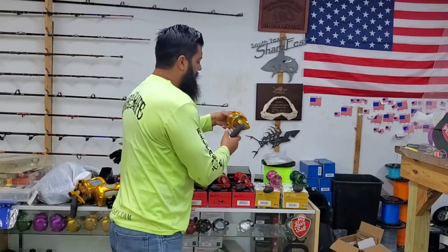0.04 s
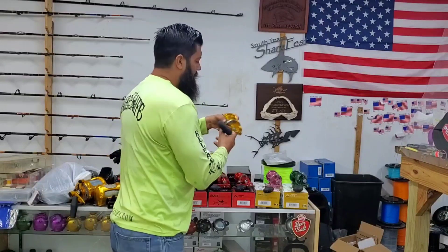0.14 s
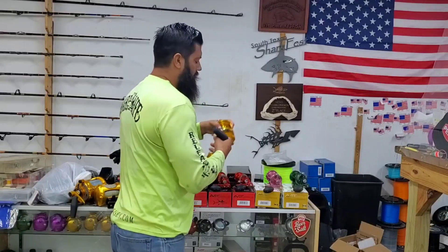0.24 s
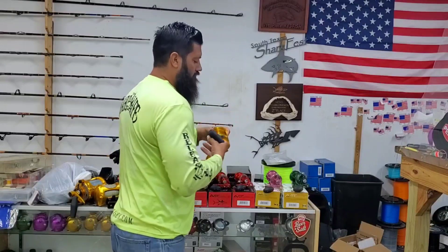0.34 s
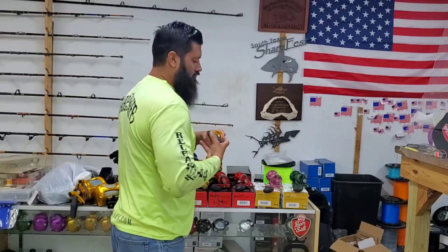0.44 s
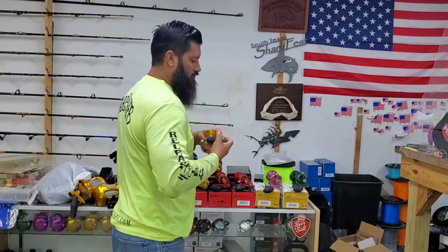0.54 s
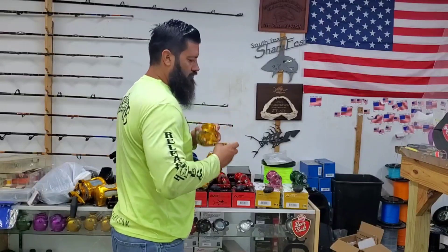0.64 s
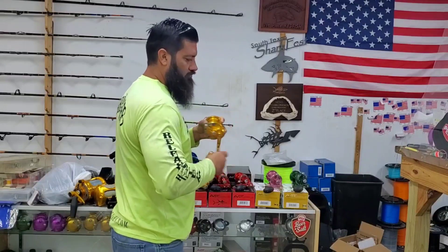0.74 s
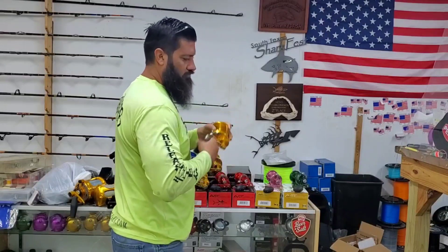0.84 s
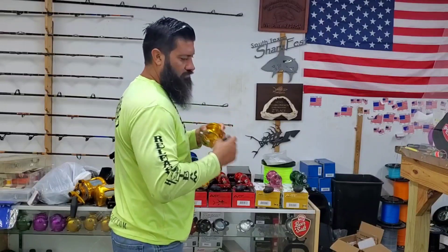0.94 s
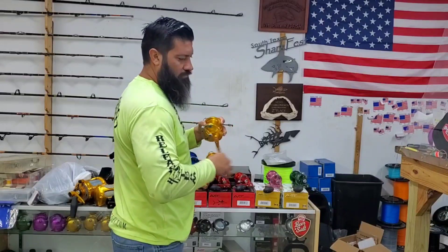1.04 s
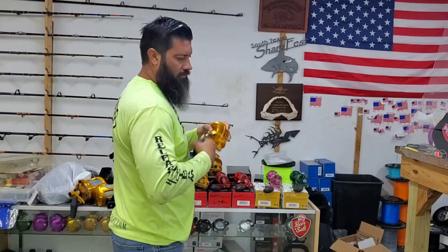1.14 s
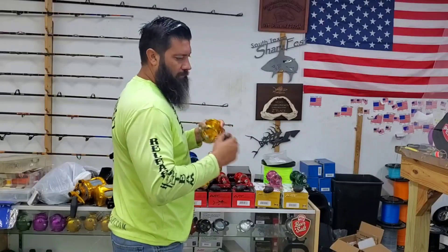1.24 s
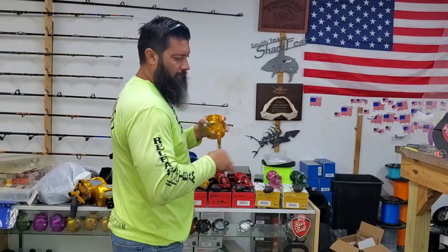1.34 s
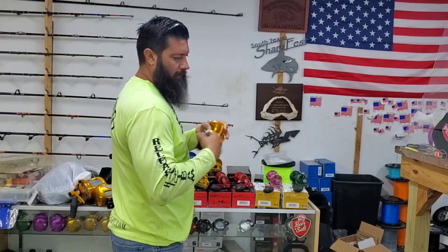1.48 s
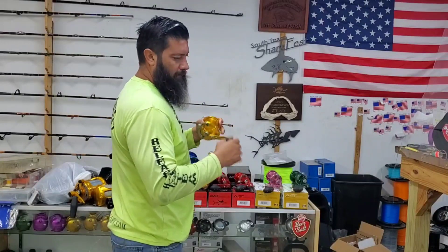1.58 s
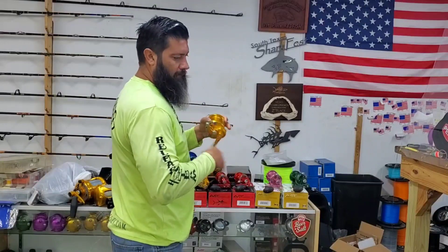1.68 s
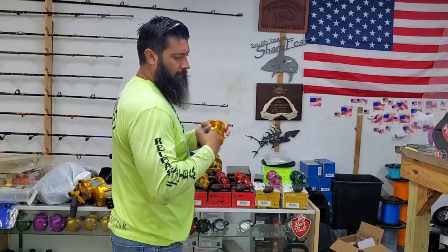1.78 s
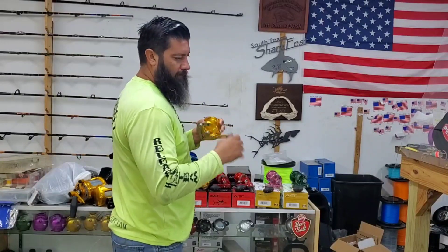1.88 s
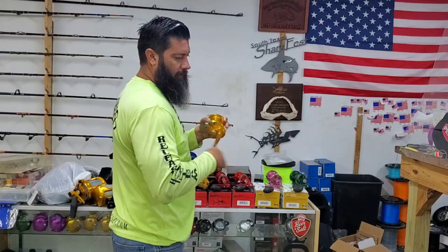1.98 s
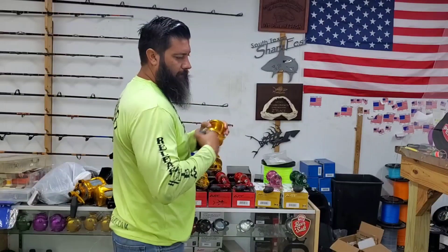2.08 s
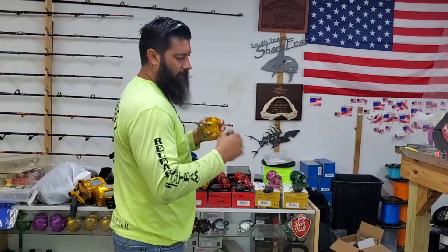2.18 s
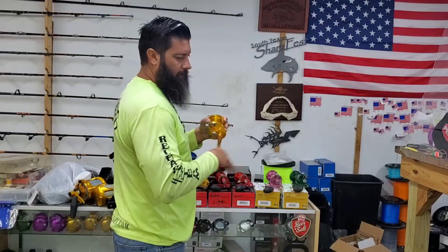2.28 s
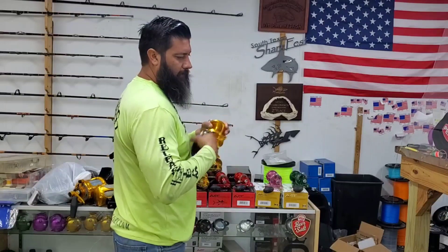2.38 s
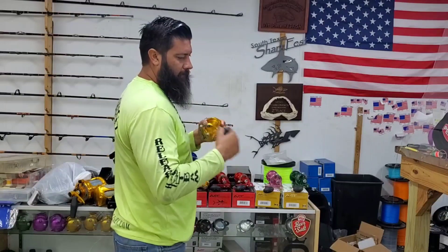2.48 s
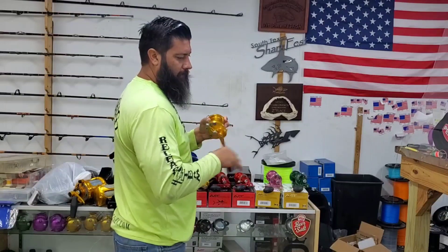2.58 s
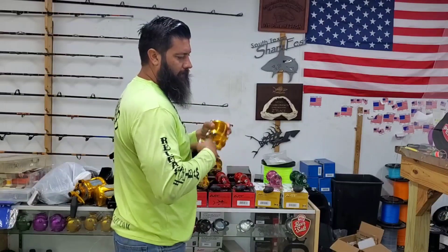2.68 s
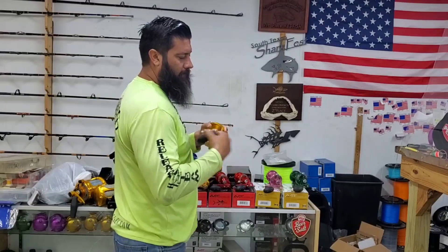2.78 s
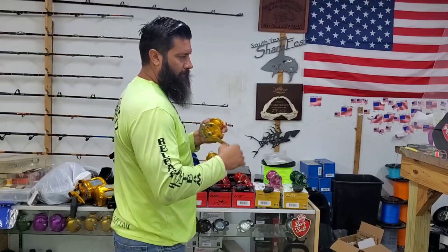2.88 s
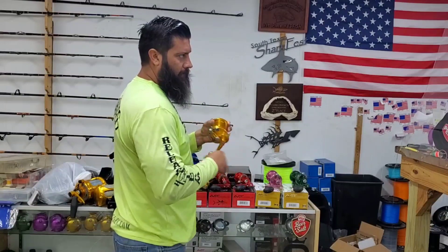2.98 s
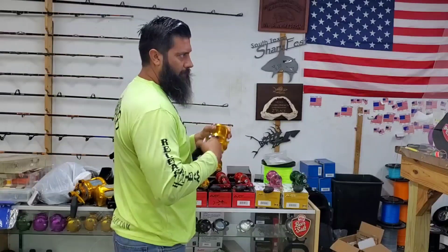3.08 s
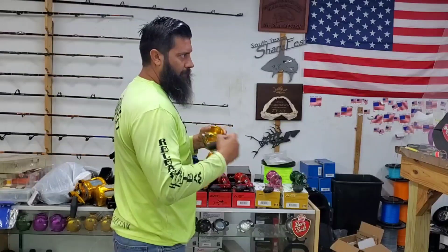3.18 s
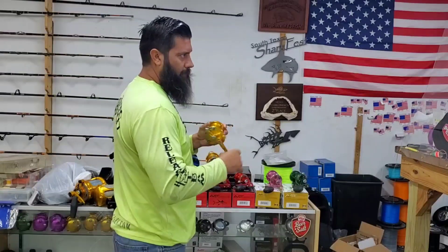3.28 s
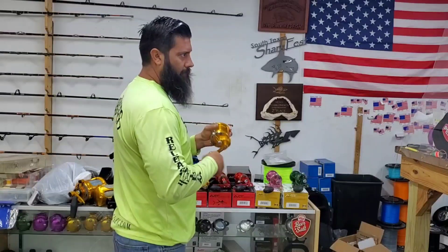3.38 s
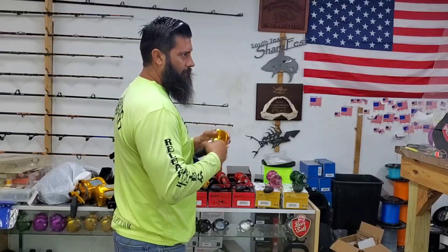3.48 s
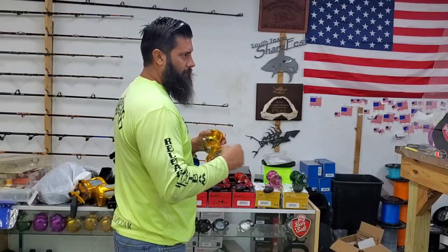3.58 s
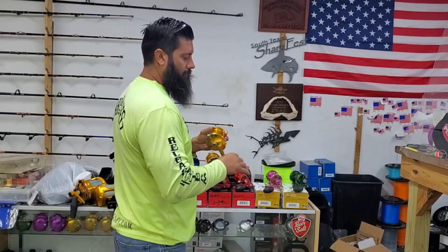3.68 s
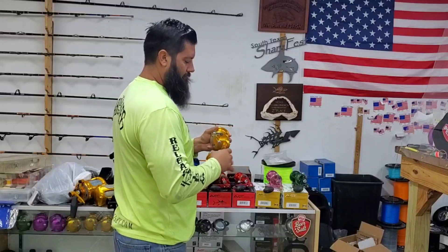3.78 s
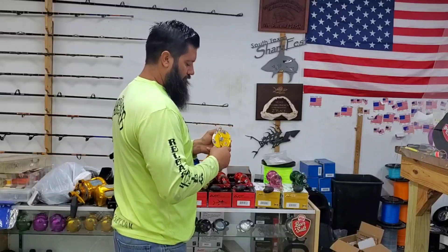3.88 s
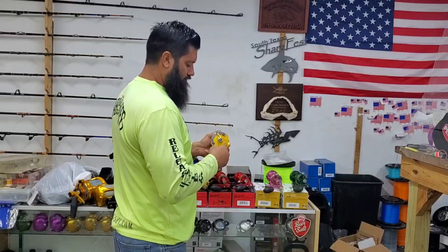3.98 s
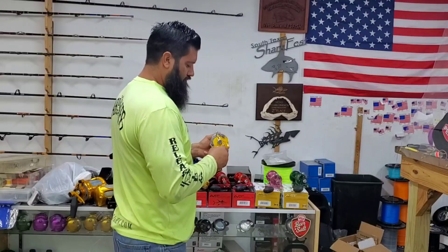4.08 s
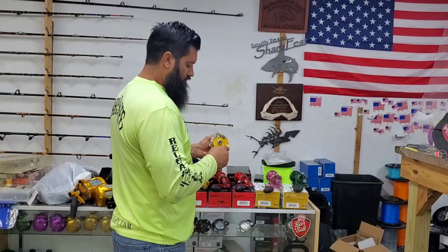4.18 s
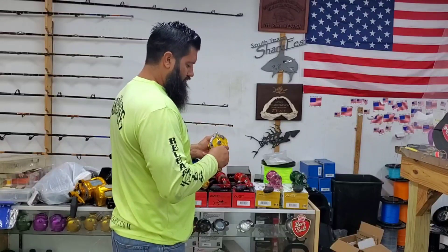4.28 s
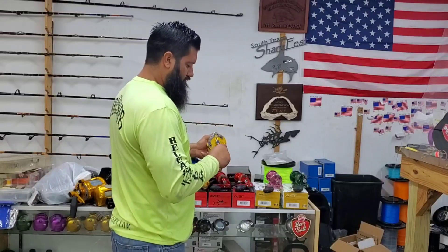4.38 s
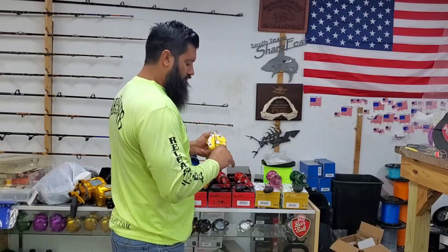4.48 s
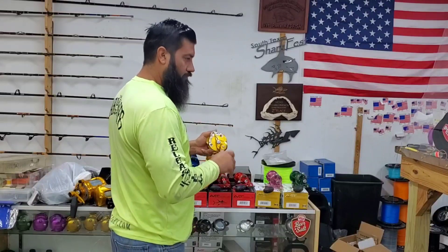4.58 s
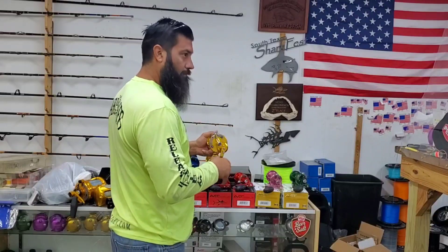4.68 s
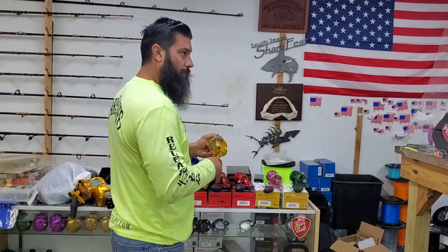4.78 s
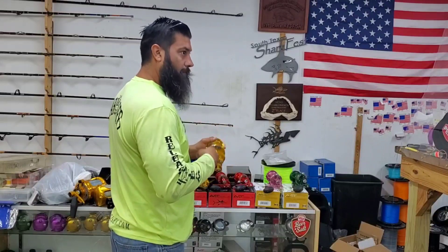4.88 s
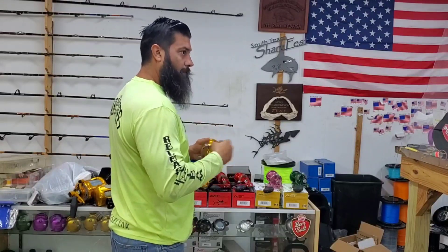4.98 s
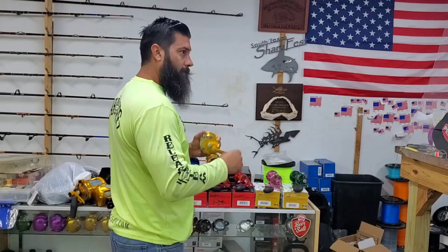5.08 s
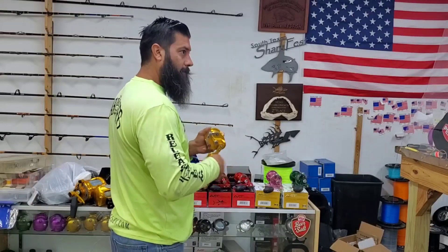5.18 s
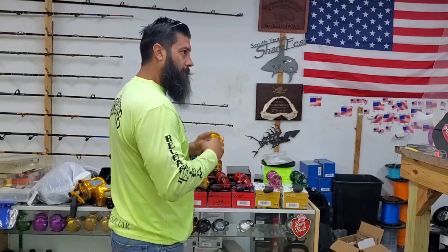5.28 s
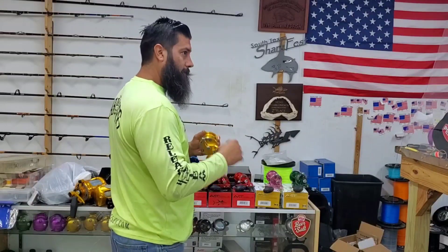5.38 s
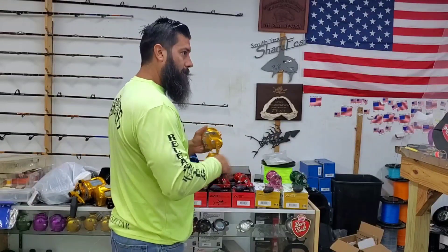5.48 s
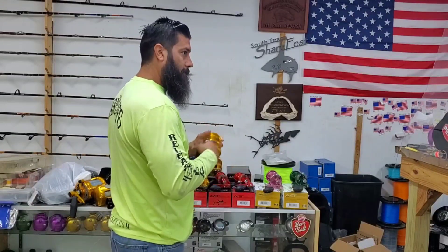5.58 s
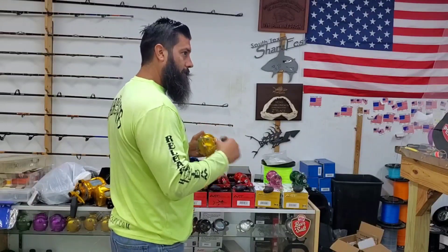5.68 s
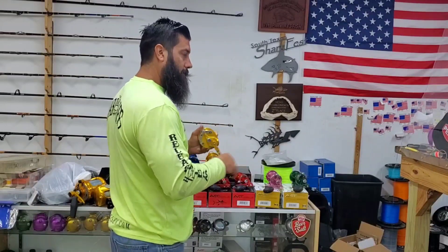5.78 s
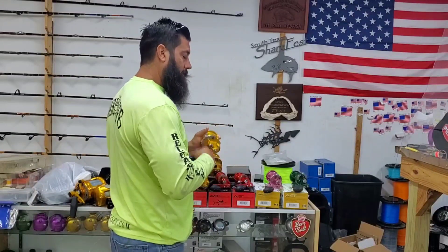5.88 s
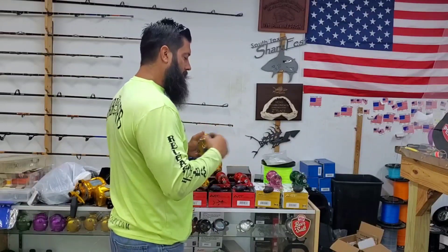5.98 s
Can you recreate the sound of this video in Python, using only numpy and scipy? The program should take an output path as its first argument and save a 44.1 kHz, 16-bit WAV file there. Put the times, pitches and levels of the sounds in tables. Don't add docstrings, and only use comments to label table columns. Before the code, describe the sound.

A quiet low ventilation hum and soft air noise run throughout a small reverberant shop. At about 0.2 seconds comes a faint dull tap, then a dozen or so sharp, ringing metallic clicks, unevenly spaced until 0.75. They merge into a loud, bright ratchet buzz, rising to about 100 to 110 snaps a second and wobbling in pace with each handle turn. From 2.6 it eases and sways more widely, ending near 3.8 with a few fading clicks. In the pause, a dull knock with a tiny after-knock sounds at 4.45, then a very faint ping near 4.77. A single click at 4.86 launches a faster run, climbing quickly from roughly 95 to 200 and nearly 290 snaps a second by 5.6, a tight, high metallic whir, easing slightly and continuing to the end around 6 seconds. The reel sits slightly left, with short wall echoes.

```python
import sys
import numpy as np
from scipy import signal
from scipy.fft import rfft, irfft, next_fast_len
from scipy.io import wavfile
from scipy.ndimage import uniform_filter1d

SR = 44100
rng = np.random.default_rng(int(sys.argv[2]) if len(sys.argv) > 2 else 0)


def file_out(sig):
    cols = np.atleast_2d(sig).T
    lim = np.clip(cols, -1, 1)
    pcm = np.round(lim * 32767).astype(np.int16)
    wavfile.write(sys.argv[1], SR, pcm)


def level_to_linear(level):
    exponent = np.asarray(level, float) / 20
    return 10 ** exponent


N = 266356

# (time [s], blow level [dB])
SLOW_CLICKS = [(.2142, -31), (.2502, -29), (.2831, -27), (.333, -27.5), (.3928, -28), (.5061, -28),
               (.539, -26.5), (.5664, -27.5), (.6009, -26.5), (.645, -27.5), (.6981, -28), (.722, -30),
               (.741, -26.5), (3.81, -27.5), (3.836, -30), (3.863, -34.5), (3.895, -39.5), (4.8577, -30.5)]
# (time [s], mean tooth rate [1/s], blow level [dB], sway of the rate [share 0-1])
RUNS = [
    [(.756, 72, -27.5, 0.13), (.87, 86, -25.5, 0.13), (1.0, 102.1, -25.5, 0.06), (1.26, 112.2, -24.5, .1),
     (1.5, 102, -25, .09), (2.6, 101.1, -26, 0.07), (2.86, 91.9, -27.5, .13), (3.1, 86.8, -27, .28),
     (3.8, 82.64, -28, .3)],
    [(4.871, 95.2, -27.5, 0.06), (4.95, 190.5, -25, 0.09), (5.05, 208.8, -24, 0.08), (5.19, 248, -25, .08),
     (5.42, 245.8, -24.5, 0.04), (5.52, 285.7, -25, 0.03), (5.66, 291.7, -25, 0.03),
     (5.73, 255.3, -26, 0.05), (6.04, 240, -25.5, 0.09)],
]
# (time [s], turns made [turns])
SLOW_POINTS = [
    [(.717, 0), (2.86, 14), (3.1, 15), (3.48, 16), (3.82, 17)],
    [(4.9, 0), (5.05, 1), (5.28, 2), (5.73, 3), (5.895, 4), (6.15, 5)],
]
MODE_HZ = [1010, 2170, 2870, 3230, 4060, 4690, 6400, 7475, 7830, 8290, 9030, 9900, 10050, 11800, 12500,
           13450]
# (width [Hz], level before the reel is turned [dB], level after [dB])
MODES = [(80, -6.5, -7.5), (240, -36, -27), (152, -23.5, -19.5), (90, -50, -24), (179.95, -19.5, -28),
         (24.19, -7, -6.5), (22.8, 1.5, 3.5), (60.2, -17, -17), (29.78, -18, -13), (60, -23, -16),
         (30, -10, -9), (80.04, -8.5, -3), (60, -2.5, -1), (351, -29, -3.5), (100, -35, -21),
         (80, -18, -13)]
# (frequency [Hz], level [dB])
TICK_TONE = [(600, -38), (1400, -4.5), (2200, -6), (2900, -1.5), (3900, 8), (4500, 6), (5500, 9), (6500, 6),
             (8300, 7), (10000, 2.5), (11000, 8), (12000, 12), (13500, 11.5), (15500, 11.5)]
# (frequency [Hz], width [Hz], dip before the turn [dB], dip after [dB])
SHADOWS = [(1380, 140, -10, -13), (2570, 130, -8, -6), (3050, 120, -1, -8), (3450, 230, -10, -5),
           (5300, 300, -3, -5), (5650, 300, -6, -4), (7100, 400, -3, -1), (8750, 250, -4, -1),
           (11050, 450, -5, 0)]
# (time [s], level [dB], decay length [s])
KNOCKS = [
    (0.175, -32.5, 0.0019),
    (4.4463, -19, 0.0055),
    (4.467, -27, 0.0014),
]
# (frequency [Hz], level [dB per Hz])
KNOCK_TONE = [(200, -15), (700, 3), (1300, 3), (2100, -1), (3900, -2.5), (5500, -5.5), (7000, -7),
              (8400, -3), (12000, -0.5), (15500, -8)]
# (frequency [Hz], level [dB], t60 [s])
PING = [(5720, -57, .6), (9330, -56, .12), (7800, -70, .1)]
# (delay [s], left level [dB], right level [dB])
WALLS = [(.004, -25.5, -11.5), (.009, -22.5, -13.5), (.017, -23, -22.5), (0.0175, -20, -16.5),
         (.024, -15.5, -19)]
# (frequency [Hz], t60 [s])
SHOP_DECAY = [(500, 0.5), (1300, 0.46), (3500, 0.31), (9000, 0.33), (14000, .23)]
# (frequency [Hz], level [dB])
SHELVES = [(500, -7), (1300, -7), (2500, 0), (16000, 0)]
# (frequency [Hz], likeness [share 0-1])
LIKENESS = [(60, 0.97), (180, 0.96), (550, 0.65), (1650, 0.16), (4970, 0.023), (15000, 0.038)]
# (frequency [Hz], level [dB per Hz])
AIR_TONE = [(24, -20), (40, -2), (76, -4), (170, -5.5), (240, -13.5), (700, -18.5), (1000, -25.5),
            (1600, -30.5), (3400, -41), (6000, -49.5), (7200, -57), (8500, -50), (12000, -58), (16000, -50)]
# (frequency [Hz], width [Hz], level [dB])
HUM = [(83.2, 9.3, -41.5), (120.86, 2.2, -44), (165.5, 12.5, -48.5), (242.6, 13.7, -51.5)]

TURNED_S = 4.5


def teeth(jitter_s=.00003, uneven_db=1.1, sway_db=0.25, sway_lag_turns=0.56):
    at, blow_db = np.transpose(SLOW_CLICKS)
    for run, slow_points in zip(RUNS, SLOW_POINTS):
        s, rate, db, sway = np.transpose(run)
        t = np.arange(s[0], s[-1], 1 / SR)
        turns = np.interp(t, *np.transpose(slow_points))
        wobble = 1 - np.interp(t, s, sway) * np.cos(2 * np.pi * turns)
        passed = np.cumsum(np.interp(t, s, rate) * wobble) / SR
        snap_s = np.interp(np.arange(int(passed[-1])), passed, t)
        swell_db = sway_db * np.cos(2 * np.pi * (np.interp(snap_s, t, turns) - sway_lag_turns))
        at = np.r_[at, snap_s]
        blow_db = np.r_[blow_db, np.interp(snap_s, s, db) + swell_db]
    luck = rng.standard_normal((2, len(at)))
    luck[:, :len(SLOW_CLICKS)] = 0
    samples = np.round((at + jitter_s * luck[0]) * SR).astype(int).clip(0, N - 1)
    return samples, level_to_linear(blow_db + uneven_db * luck[1])


def clicker():
    at, size = teeth()
    out = ringing(at, size) + ticks(at, size)
    turned = np.arange(N) >= TURNED_S * SR
    return sum(filtered(out * (turned == hold), lambda hz: radiated(hz, hold)) for hold in (0, 1))


def ringing(at, size, spread_db=4.0, slip_s=.00003, ring_db=2.5, slow_ring_db=4.5):
    lone = np.arange(len(at)) < len(SLOW_CLICKS)
    out = np.zeros(N)
    for hz, (width, first_db, second_db) in zip(MODE_HZ, MODES):
        luck, slip = rng.standard_normal((2, len(at)))
        late = np.minimum(abs(slip_s * SR * (hz > 2000) * slip), 60).astype(int)
        spread = spread_db * min(hz / 4000, 1) * luck
        spread = np.where(lone, slow_ring_db * (2500 < hz < 7000) + 0.31 * spread, spread)
        mode_db = np.where(at < TURNED_S * SR, first_db, second_db)
        blows = np.zeros(N + 64)
        np.add.at(blows, at + late, size * level_to_linear(mode_db + spread))
        out += level_to_linear(ring_db) * np.sqrt(width / 30) * ring(blows[:N], hz, width)
    return out


def ticks(at, size, tick_db=28.5, rattle_s=.0006, rattle_db=-15):
    blows = np.zeros(N)
    np.add.at(blows, at, size)
    decay = np.exp(-1 / (rattle_s * SR))
    rattle = signal.lfilter([0, 1], [1, -decay], blows) * rng.standard_normal(N)
    return level_to_linear(tick_db) * colour(blows + level_to_linear(rattle_db) * rattle, TICK_TONE)


def ring(x, hz, width):
    r, w = np.exp(-np.pi * width / SR), 2 * np.pi * hz / SR
    return signal.lfilter([.5, 0, -.5], [1, -2 * r * np.cos(w), r * r], x)


def radiated(f, hold, small_hz=900):
    shade_db = 0
    for row in SHADOWS:
        shade_db = shade_db + row[2 + hold] / (1 + (2 * (f - row[0]) / row[1]) ** 2)
    return level_to_linear(shade_db) / np.sqrt(1 + (small_hz / (f + 1)) ** 10)


def knocks(ping_s=4.767):
    t, noise, hits = np.arange(N) / SR, rng.standard_normal(N), np.zeros(N)
    for s, db, length in KNOCKS:
        hits += level_to_linear(db) * (t >= s) * np.exp(-np.maximum(t - s, 0) / length) * noise
    u = np.maximum(t - ping_s, 0)
    ping = sum(level_to_linear(db - 60 * u / t60) * np.sin(2 * np.pi * hz * u) for hz, db, t60 in PING)
    return colour(hits, KNOCK_TONE) + ping


def shop(x, hand_hz=2.6):
    out = np.zeros((2, N))
    for s, left_db, right_db in WALLS:
        for side, db in enumerate((left_db, right_db)):
            lag = round((s + 0.00037 * side) * SR)
            out[side, lag:] += level_to_linear(db) * x[:-lag]
    angle = 2 * np.pi * hand_hz * np.arange(N) / SR
    for k in range(3):
        taps = np.zeros((2, 24000))
        at = np.arange(100, 23980, 10) + rng.integers(0, 10, (2, 2388))
        np.put_along_axis(taps, at, rng.choice([-1., 1.], at.shape), 1)
        hz, t, z = signal.stft(taps, SR, nperseg=128)
        fade = level_to_linear(-60 * t / read(SHOP_DECAY, hz)[:, None])
        tail = signal.istft(z * fade, SR, nperseg=128)[1]
        feed = x * np.sqrt(2 / 3) * np.cos(angle + k * np.pi / 3)
        out += signal.fftconvolve(feed[None], tail / np.linalg.norm(tail[0]), axes=1)[:, :N]
    return out


def ventilation(air_db=-39):
    air = colour(paired(*rng.standard_normal((2, N))), AIR_TONE)
    tones = sum(level_to_linear(db) * evened(ring(rng.standard_normal(N), hz, width)) for hz, width, db in HUM)
    return level_to_linear(air_db + np.array([[.3], [-.3]])) * air + tones


def paired(left, other):
    def same(hz):
        return np.clip(read(LIKENESS, hz), 0, 1)
    right = filtered(left, same) + filtered(other, lambda hz: np.sqrt(1 - same(hz) ** 2))
    return np.array([left, right])


def evened(x):
    return x / np.sqrt(np.mean(x ** 2) + 1e-20)


def read(points, hz):
    f, value = np.transpose(points)
    return np.interp(np.log(hz + 1), np.log(f + 1), value)


def colour(x, points):
    return filtered(x, lambda hz: evened(level_to_linear(read(points, hz))))


def filtered(x, gain):
    size = next_fast_len(N, True)
    return irfft(rfft(x, size) * gain(np.fft.rfftfreq(size, 1 / SR)), size)[..., :N]


def scene():
    reel = clicker() + knocks()
    direct = level_to_linear(-7) * np.array([reel, level_to_linear(-8.0) * np.roll(reel, 1)])
    echoes = paired(*shop(filtered(reel, lambda hz: level_to_linear(read(SHELVES, hz)))))
    return direct + level_to_linear(1.0) * echoes * level_to_linear(np.array([[.3], [-.3]])) + ventilation()


def masked(x, under_db=-7.5, quiet_db=-80.0):
    hz, _, z = signal.stft(x, SR, nperseg=1024)
    hz = hz[:, None]
    power = (abs(z) ** 2).mean(0) * (hz > 800)
    near = uniform_filter1d(uniform_filter1d(power, size=4, axis=0), size=2, axis=1)
    wide = abs(uniform_filter1d(np.cbrt(near), size=70, axis=0)) ** 3
    hidden = near < wide * level_to_linear(2 * (under_db + 1.8 * (hz < 6000)))
    drop = hidden & (wide > level_to_linear(2 * quiet_db)) & (hz > 1250)
    return signal.istft(z * np.where(drop, .03, 1), SR, nperseg=1024)[1][:, :N]


def band_limit(x):
    return signal.sosfilt(signal.butter(12, 16540, fs=SR, output="sos"), x)


def record(dry):
    power = signal.lfilter([.0002], [1, -.9998], (dry ** 2).mean(0))
    over_db = np.maximum(10 * np.log10(power + 1e-12) + 22.5, 0)
    levelled = masked(dry * level_to_linear(-.45 * over_db))
    edge = signal.firwin(1023, 15470, window=("kaiser", 6), fs=SR)
    mix = signal.oaconvolve(levelled, edge[None], "same")
    return band_limit(mix)


dry = scene()
out = record(dry)
file_out(out)
```